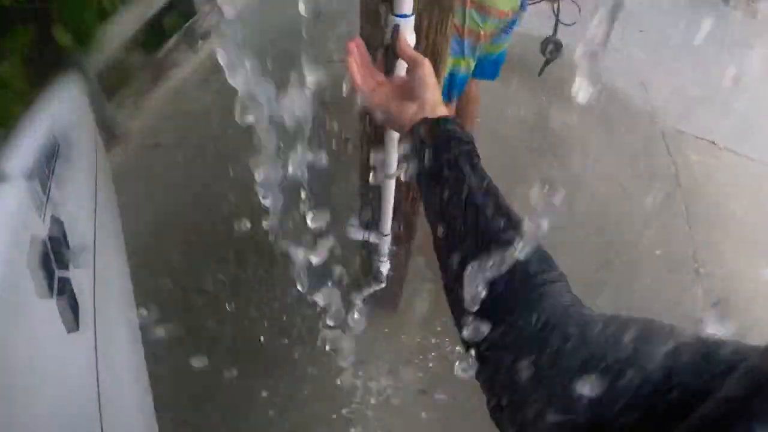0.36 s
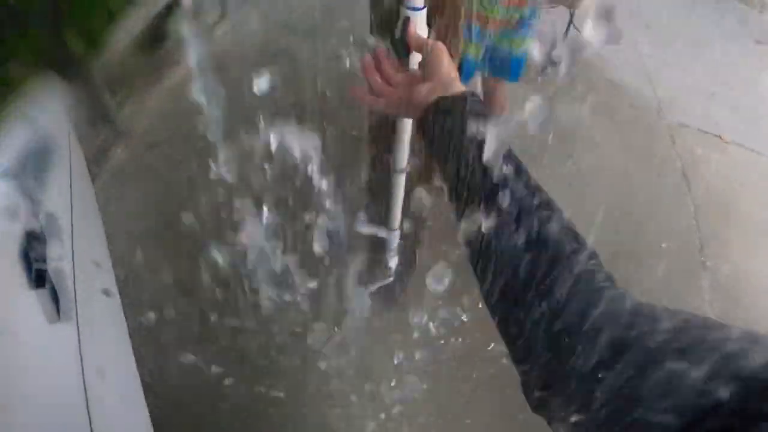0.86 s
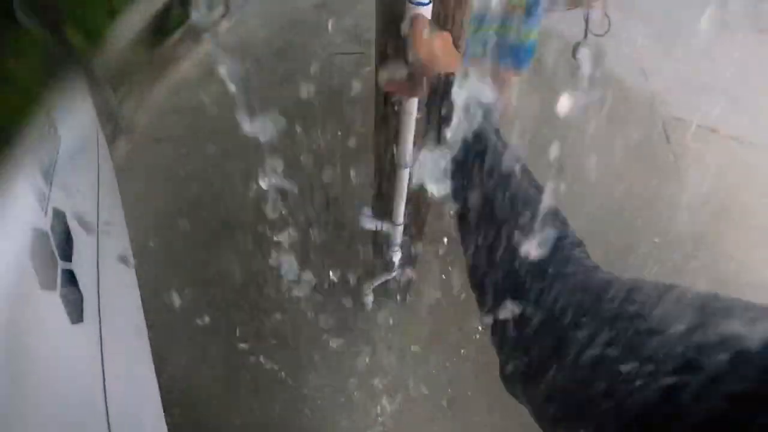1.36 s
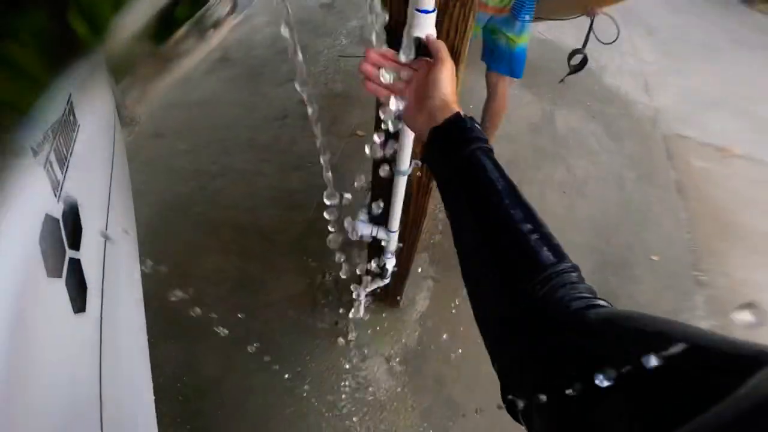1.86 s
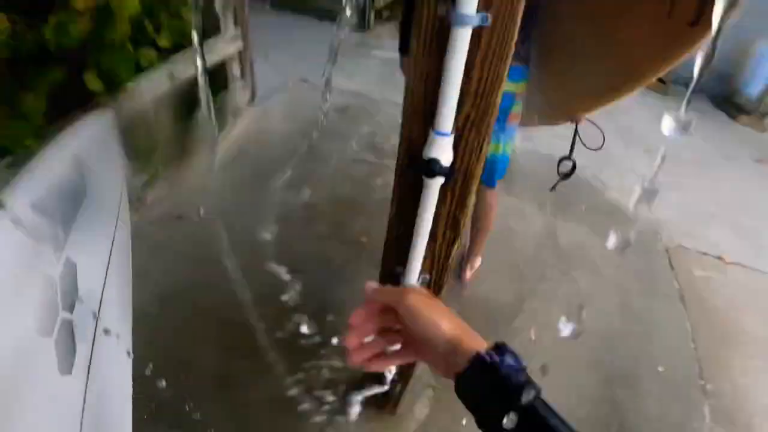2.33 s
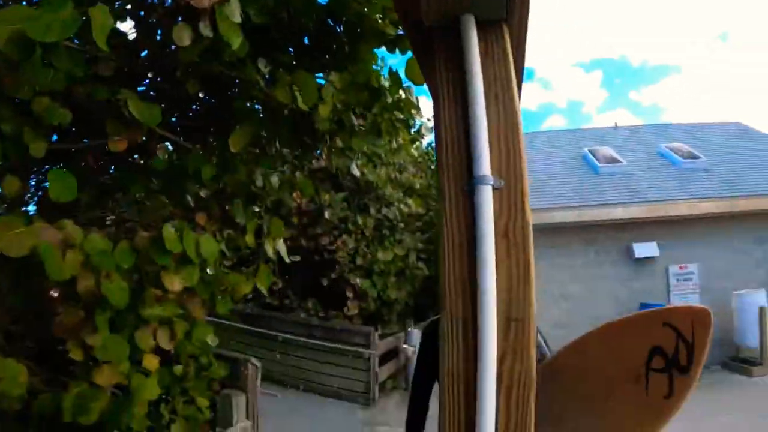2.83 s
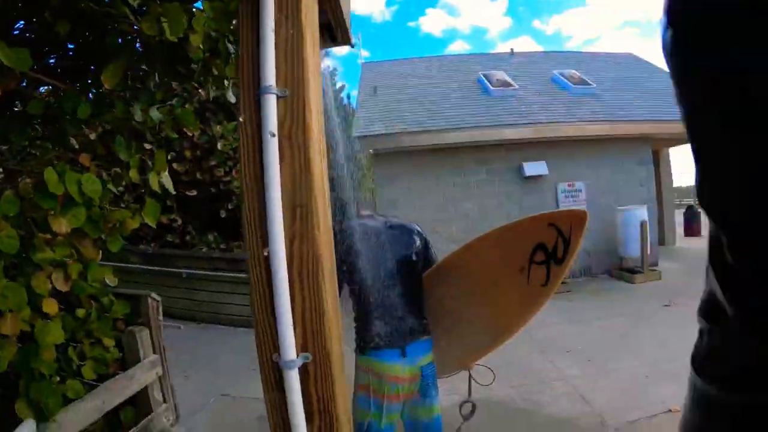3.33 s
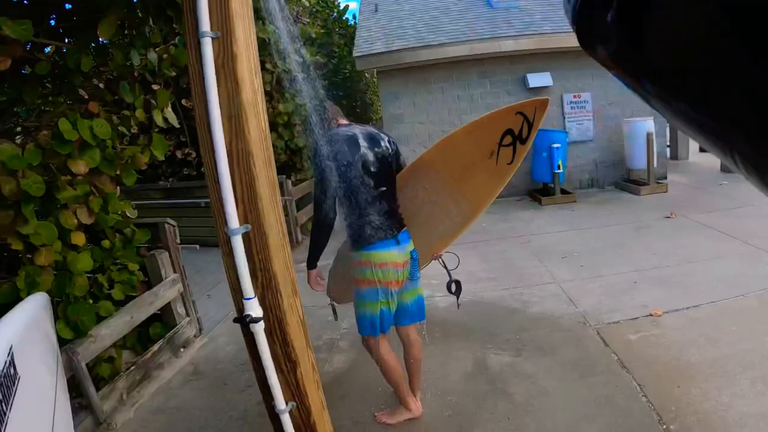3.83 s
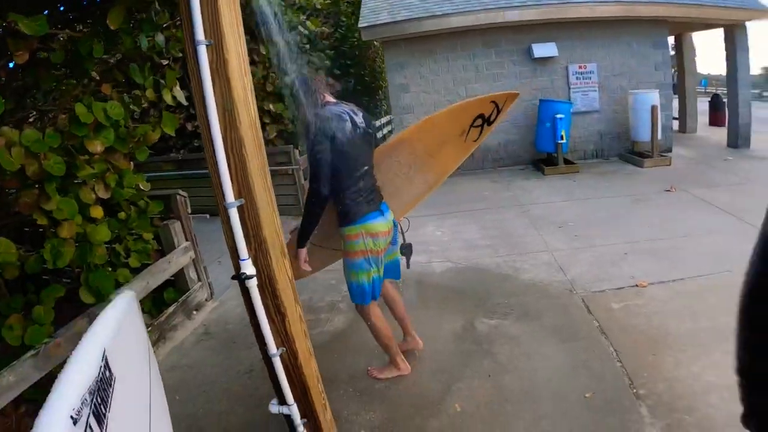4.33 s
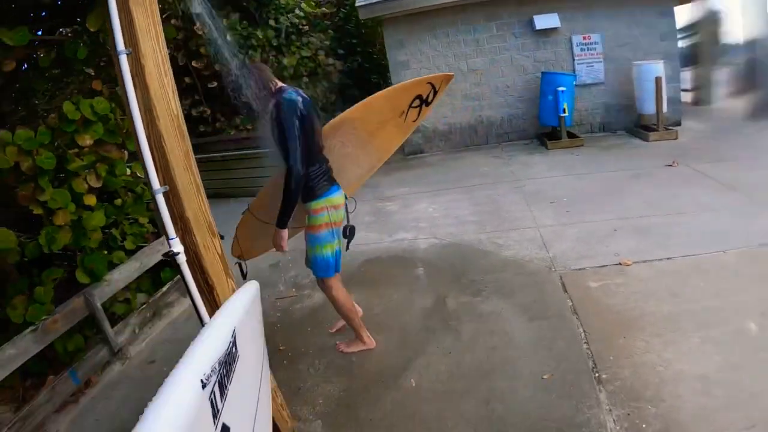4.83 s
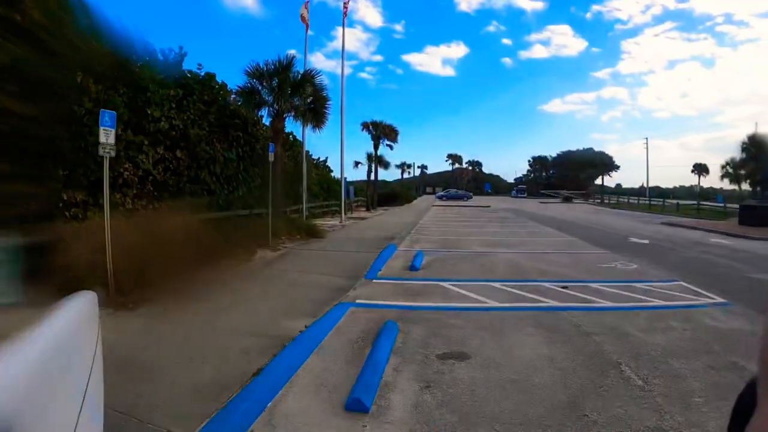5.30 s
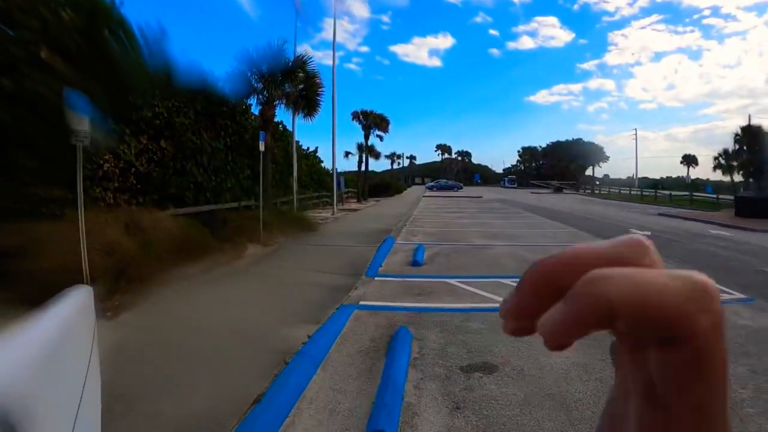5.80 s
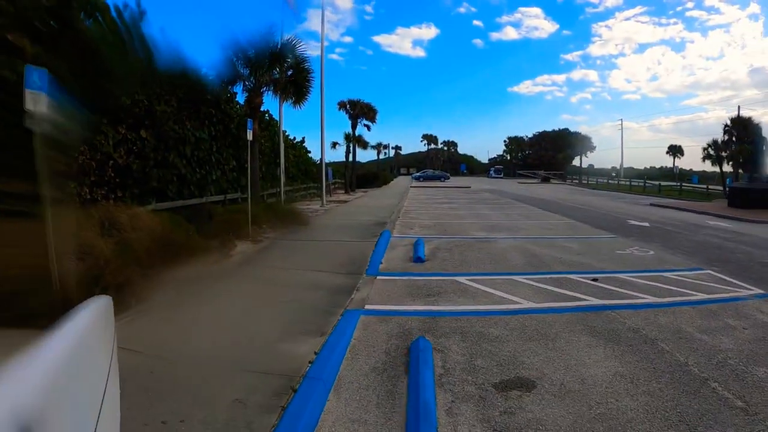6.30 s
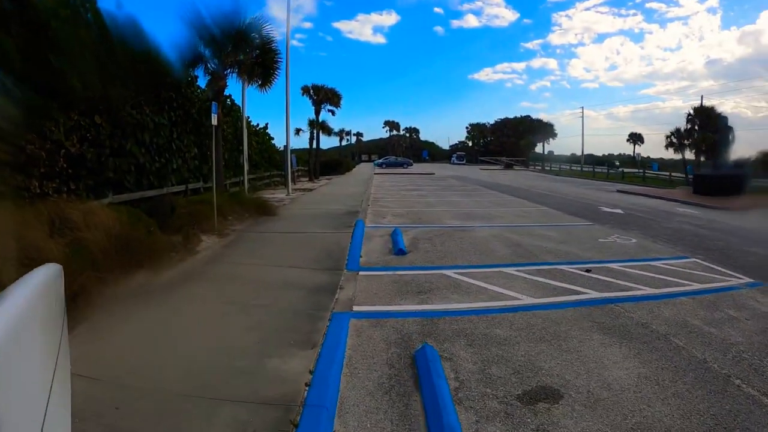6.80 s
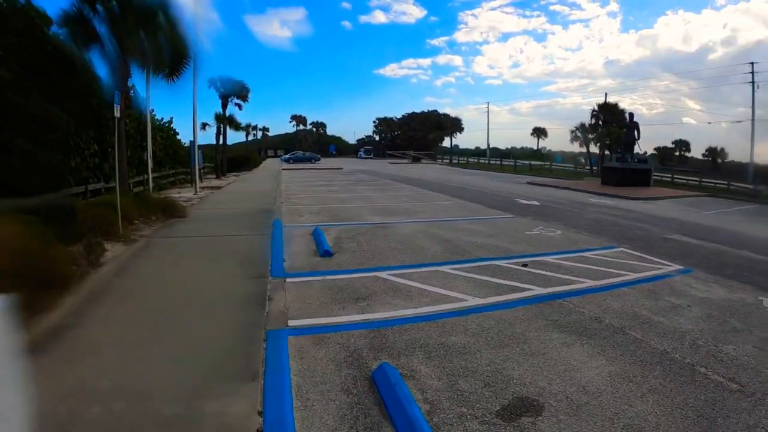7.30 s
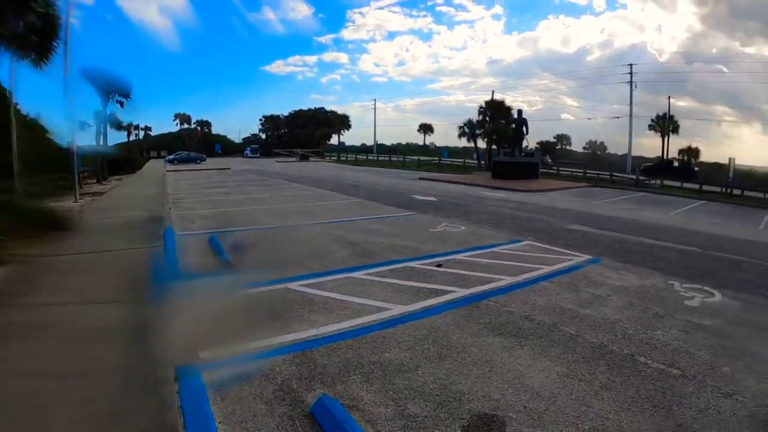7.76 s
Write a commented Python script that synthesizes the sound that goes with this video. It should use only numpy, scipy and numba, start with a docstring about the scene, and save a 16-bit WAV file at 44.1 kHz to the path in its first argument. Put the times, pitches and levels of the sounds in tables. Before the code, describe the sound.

Beach shower water splatters, plops and gurgles muffled against a wet waterproof microphone, thins, cuts out, then muffled wind, footsteps and a faint idling diesel.

```python
"""Shower to car park

A wet action camera hears a beach shower, then a spot beside it; after a short silence a scuff leads to a car park.
Noise in six bands makes the spray and wind, dulled by a water-filled housing that rings near 1.2 kHz.
Sliding tones plop on the two microphone ports, short rings make taps and drips, and bursts of noise make spits.
Steps are low jolts, a diesel and a pump are sums of wavering tones, and a limiter ducks after loud hits.
"""
import sys
import numpy as np
from scipy import signal
from scipy.fft import rfft, irfft, next_fast_len
from scipy.io import wavfile
from scipy.ndimage import uniform_filter1d
from numba import njit

SR = 44100
rng = np.random.default_rng(int(sys.argv[2]) if len(sys.argv) > 2 else 0)


def volts_from_decibels(level):
    """Turn decibel levels (scalar or array-like) into linear amplitude factors."""
    exponent = np.asarray(level, float) / 20
    return 10 ** exponent


def master(y):
    """Save y as 16-bit WAV."""
    cut = np.clip(np.atleast_2d(y).T, -1, 1)
    pcm = np.round(cut * 32767)  # scale
    wavfile.write(sys.argv[1], SR, pcm.astype(np.int16))


N = 359415
T = np.arange(N) / SR


def walk(rate, size):
    """Random levels held 1 / rate s and smoothed twice; spread near 1."""
    hold = int(SR / rate)
    steps_held = np.repeat(rng.standard_normal(size // hold + 1), hold)
    return 1.86 * uniform_filter1d(uniform_filter1d(steps_held, hold), hold)[:size]


def over_hz(table, size):
    """The columns of a (Hz, ..) table at every bin, joined on a log-frequency axis."""
    hz, *columns = np.transpose(table)
    bins = np.log(np.fft.rfftfreq(size, 1 / SR) + 1)
    return [np.interp(bins, np.log(hz), c) for c in columns]


def over_time(table, first, last):
    """The columns of a (time, ..) table at every sample of a stretch, with soft corners."""
    s, *columns = np.transpose(table)
    return [uniform_filter1d(np.interp(T[first:last], s, c), size=300) for c in columns]


def add(out, s, sound):
    """Mixes a short sound in at a moment."""
    i = max(int(s * SR), 0)
    out[..., i:i + sound.shape[-1]] += sound[..., :out.shape[-1] - i]


def patter(size, rate, spread_db, share):
    """Steady noise with single droplets of very uneven size in it."""
    hit = rng.random(size) < rate / SR
    drops = hit * rng.standard_normal(size)
    drops = drops * volts_from_decibels(spread_db * np.minimum(rng.exponential(size=size), 3))
    steady = np.sqrt(1 - min(share, 1) ** 2) * rng.standard_normal(size)
    return steady + share * drops / drops.std()


# Borders between the bands: buffeting | cavity | valley | housing | low hiss | high hiss: frequency [Hz]
BAND_EDGES = [197, 720, 960, 1708, 2550]
# How much each band flickers, low to high, before a place's raggedness scales it: level [dB]
BAND_FLICKER = [2.5, 1.5, 2, 1.2, 1.5, 1.5]
# Treble ring of the wet left port: (frequency [Hz], width [Hz], boost [dB])
LEFT_PORT_RING = (4500, 900, 11)
# The valley near 850 Hz against the housing ring: (time [s], level [dB])
VALLEY = [(0.1, -9), (1.6, -7.5), (1.95, -19.5), (2.2, -8), (3.2, -10.5), (3.3, -20.5), (3.44, -18),
          (3.55, -11.5), (5.0, -9), (5.35, -11.5), (5.6, -11), (8.1, -11)]
CAVITY_FOLLOWS = 0.78  # dB for each dB that the housing ring moves
LEAN_SPREAD_DB, LEANS_PER_S = 6, 9.03


def rush(span, ports, curves, hiss, colour, grain, wet, ragged):
    """Spray and wind: partly shared by the ports, six bands that swell together and flicker alone."""
    first, last = int(span[0] * SR), min(int(span[1] * SR), N)
    length = last - first
    size = next_fast_len(length)
    hz = np.fft.rfftfreq(size, 1 / SR)

    left_db, right_db, lead, like = over_hz(ports, size)
    like = np.clip(like, 0, 1)
    shared, own = rfft(patter(size, *grain)), rfft(patter(size, *grain))
    right = like * np.exp(1j * lead) * shared + np.sqrt(1 - like ** 2) * own
    pair = volts_from_decibels(left_db) * np.array([shared, volts_from_decibels(right_db) * right])
    ring_hz, width_hz, ring_db = LEFT_PORT_RING
    pair[0] *= volts_from_decibels(wet * ring_db / (1 + (2 * (hz - ring_hz) / width_hz) ** 2))
    pair *= 1 / np.sqrt(1 + (hz / 7500) ** 6)  # the housing lets little through at the very top

    housing_db, buffet_db = over_time(curves, first, last)
    low_db, high_db = over_time(hiss, first, last)
    usual_db = np.median(housing_db)
    cavity_db = usual_db + colour[0] + CAVITY_FOLLOWS * (housing_db - usual_db)
    valley_db = housing_db + np.interp(T[first:last], *np.transpose(VALLEY))
    pan_db = colour[1] + LEAN_SPREAD_DB * walk(LEANS_PER_S, length)
    swell = (1 + grain[2]) * walk(14, length)  # the larger the share of droplets, the lumpier

    below = [0] + [1 / (1 + (hz / edge) ** 24) for edge in BAND_EDGES] + [1]
    out = np.zeros((2, N))
    for k, band_db in enumerate([buffet_db, cavity_db, valley_db, housing_db, low_db, high_db]):
        band = irfft(pair * np.sqrt(below[k + 1] - below[k]), size)[:, :length]
        if k == 0:  # gusts hit now one port, now the other
            lean = volts_from_decibels(np.array([pan_db, -pan_db]) / 2)
            band = band / band.std(axis=1, keepdims=True) * lean * 2 / np.sqrt((lean ** 2).sum(axis=0))
        else:
            band = band / band.mean(axis=0).std()
        motion_db = .6 * swell + BAND_FLICKER[k] * walk(40, length)
        out[:, first:last] += band * volts_from_decibels(band_db + (ragged if k > 1 else 1) * motion_db)
    ends = np.interp(T, [span[0] - .006, span[0] + .006, span[1] - .008, span[1]], [0, 1, 1, 0])
    return out * ends


# In every list of places: under the shower, beside it, a scuff over the ports, the car park.
# When each place sounds: (start [s], end [s])
SPANS = [(0, 2.565), (2.56, 5.09), (5.24, 5.465), (5.46, 8.2)]
# Tone of the rush through the two ports, shape within each band; one table for each place:
# (frequency [Hz], left level [dB per Hz], right minus left [dB], right lead [rad], likeness [0-1])
UNDER_PORTS = [(24.9, -55, -16, -3.5, 0.1), (50, -53, 7.5, 1.8, 1), (85, -50, 0.5, 0.98, 0.7),
               (160, -57, -2.5, 1.5, 0.7), (300, -59.5, -12, -1, 0.1), (487, -49, -13.5, -1.5, 0.5),
               (640, -52.5, -11, -1.7, 1), (803, -72, -1.5, -1.83, 0.94), (1264, -59.5, 1.5, -1.5, 1),
               (1722, -89, 3.5, -2, 0.7), (1990, -81, -5.5, -3, 0.3), (2580, -94, -3, -1.5, 0.5),
               (3240, -96.5, 2.5, -1.5, 0.93), (3930, -103, 5, -1.5, .5), (4500, -103, -3.5, -2.5, 0.6),
               (7100, -117, -13, -7, 0.4)]
BESIDE_PORTS = [(25, -55, -8.5, -1, 0.44), (50, -31, -17.5, 0.1, 1), (89, -45, -14.5, -2, 0.8),
                (160, -54, -7.5, -0.7, 0.22), (300, -62.5, -12, -1.5, 0.13), (490, -52.5, -10.5, 0, 0.23),
                (636, -59.5, -13, -2.5, 0.9), (868, -76.5, 1.5, -1.6, 1), (1196, -65, -0.5, -1.43, 0.92),
                (1557, -90, 5, -2, 0.72), (1990, -89.5, -9, -2, 0.53), (3050, -108, -4.5, -14, 0.28),
                (4300, -116, 4, 8.5, 0.31), (6950, -135, -0.5, 1, 0.12)]
SCUFF_PORTS = [(25.1, -51, -8, -2.5, .4), (100, -53, -10, -1.5, .4), (170, -61.5, -7.5, 2, .5),
               (280, -60, -11.5, -2.5, 0.59), (380, -64, -15, -2, 0.87), (482, -53.5, -14, 2.5, 0.77),
               (600, -65, -5.5, 3.5, 0.74), (850, -73.5, -3.5, 5, 1), (1130, -61, 0, 4.5, 0.72),
               (1350, -59.5, 2, 5, 1), (1710, -66.5, 3.5, 4.5, 0.96), (2230, -71.5, 4.5, 5, .9),
               (2520, -89, 0, 5.5, .8), (3050, -91.5, 4.5, 4, .7), (3400, -100, 0.5, 5, .5),
               (4500, -104, -1, 21, .3), (5200, -120, 5, 9, .2), (7000, -140, 3.5, -0.5, .1)]
CAR_PARK_PORTS = [(25, -60, -12, -7, 0.45), (50, -47.5, -9, -5.5, 1), (90, -56, -7.5, 0.47, 0.83),
                  (160, -55, -7.5, 0.33, 0.33), (300, -57, -9, 1.5, 0.93), (500, -54, -17, 5, 0.4),
                  (607, -61.5, -12, 2.5, 0.36), (951, -78.5, -2.5, 4.5, 0.4), (1287, -63.5, 2, 4.5, 1),
                  (1663, -79.5, 2.5, 4.5, 0.95), (2200, -82, 4, 4.5, 0.47), (2540, -94, 1.5, 4.5, 0.77),
                  (2920, -97.5, 3.5, 4.5, .7), (3260, -105, 3.5, 4.5, 0.68), (4470, -111, -4, 4.5, 0.22),
                  (7040, -132, -1, 0, 0.083)]
# Per place, before swell and flicker: (time [s], housing ring level [dB], buffeting level [dB])
RUSH_LEVELS = [
    [(0.0, -35, -23), (0.11, -29.5, -28), (0.2, -30.5, -30.5), (0.7, -27, -24), (0.81, -25.5, -28),
     (0.83, -32.5, -26), (0.89, -29.5, -28), (0.91, -27.5, -21.5), (1.3, -24.5, -25.5), (1.48, -24, -21),
     (1.59, -38, -30.5), (1.75, -33.5, -32.5), (1.95, -35, -41.5), (2.1, -34, -24.5), (2.125, -42.5, -21),
     (2.35, -30, -19.5), (2.42, -40.5, -25), (2.56, -29.5, -18)],
    [(2.565, -60.5, -19.5), (2.62, -57, -11.5), (2.64, -67, -45), (2.697, -60, -41.5), (2.729, -50, -36),
     (2.755, -60.5, -39), (2.91, -53, -43), (3.3, -48.5, -44.5), (3.5, -47.5, -34.5), (3.62, -44, -25),
     (3.81, -40.5, -32), (4.31, -36, -32), (4.47, -38, -36), (4.63, -31, -21), (4.74, -37.5, -28),
     (5.06, -40.5, -30)],
    [(5.24, -94, -62), (5.305, -27, -31.5), (5.35, -24, -26), (5.4, -18, -29.5), (5.44, -13, -26),
     (5.46, -29.5, -14)],
    [(5.47, -37, -42), (5.57, -38.5, -29), (5.7, -52, -33), (5.84, -44, -32.5), (5.98, -51.5, -43),
     (6.14, -42.5, -36), (6.66, -42.5, -39.5), (7.17, -40.5, -33), (7.31, -37, -28), (7.45, -43.5, -33),
     (7.8, -41.5, -28.5), (8.15, -46, -40)],
]
# Per place, before swell and flicker: (time [s], low hiss level [dB], high hiss level [dB])
HISS_LEVELS = [
    [(0, -60.5, -70.5), (.1, -57.5, -64), (.4, -59.5, -67), (.8, -53, -59), (.83, -60, -64.5),
     (.92, -53.5, -60), (1.2, -52, -58), (1.53, -54, -59), (1.59, -62, -69), (1.95, -62.5, -71),
     (2.05, -67, -69.5), (2.14, -71, -76), (2.28, -71, -69), (2.37, -46.5, -65), (2.41, -69, -76),
     (2.5, -45, -64), (2.56, -47.5, -60.5)],
    [(2.565, -74, -87), (2.62, -84, -95), (2.65, -87, -100), (2.72, -76, -84.5), (2.77, -87.5, -83.5),
     (2.9, -78.5, -85.5), (3.1, -74, -80), (3.19, -72, -79), (3.25, -76, -81), (3.35, -74, -79),
     (3.5, -72, -76), (4.0, -61.5, -76), (4.4, -62, -72.5), (4.69, -56.5, -73), (4.88, -69.5, -77.5),
     (5.02, -68.5, -73), (5.08, -68, -81.5)],
    [(5.24, -93, -105), (5.275, -81.5, -98), (5.305, -56.5, -57.5), (5.35, -53, -61.5), (5.382, -33, -41),
     (5.408, -33.5, -53.5), (5.426, -20.5, -35), (5.453, -22, -41.5), (5.465, -51, -63)],
    [(5.47, -63.5, -67), (5.55, -52, -63), (5.7, -65, -78), (5.88, -56.5, -71.5), (5.94, -69, -79),
     (6.05, -58, -74.5), (6.25, -55, -72), (6.5, -50, -68.5), (6.9, -56, -65.5), (7.1, -54, -67.5),
     (7.3, -47, -62.5), (7.45, -55, -70.5), (7.78, -67.5, -65), (7.95, -59, -67), (8.15, -67, -71.5)],
]
# Per place: (usual port cavity level above the housing ring [dB], mean lean of the gusts to the left [dB])
COLOUR = [(2, 1.4), (4.5, 13.7), (-2.5, 8), (7, 10)]
# Droplets per place: (rate [1/s], spread [dB], share of the rush [0-1])
DROPLETS = [(600, 2.3, .62), (500, 3.0, .5), (900, 1.5, .45), (300, 2.0, .12)]
# Per place, how much of the left port's treble ring is heard: share [0-1]
LEFT_PORT_WET = [1, 1, 0, .3]
# Per place, how much the bands above the cavity swell and flicker: factor
RAGGED = [.7, 1.2, 1.5, .4]


def water():
    """The rush of every place in turn, each with its own port colour and droplets."""
    ports = [UNDER_PORTS, BESIDE_PORTS, SCUFF_PORTS, CAR_PARK_PORTS]
    places = zip(SPANS, ports, RUSH_LEVELS, HISS_LEVELS, COLOUR, DROPLETS, LEFT_PORT_WET, RAGGED)
    return sum(rush(*place) for place in places)


# Water plopping over a port, levels before dulling and rasp:
# (time [s], left level [dB], right level [dB], pitch at the peak [Hz])
PLOPS = [(0.023, -2.5, -32, 307), (0.149, -10.5, -2, 142), (0.342, 1.5, -32.5, 367),
         (0.546, -6.5, -18, 220), (0.818, 3.5, -34, 330), (1.119, -13, -11, 266), (1.248, -25.5, -4.5, 160),
         (1.273, -1.5, -34, 379), (1.311, 2, -33, 280), (1.546, -4, -39, 330), (2.113, -16, -16, 610),
         (2.139, -20, -18, 694), (2.148, -11.5, -45, 217), (2.164, -28, -22, 760), (2.33, -11, -17, 332),
         (2.368, -9, -19, 565), (2.376, -8.5, -9, 200), (2.425, -11.5, -24, 510), (2.445, -19.5, -21, 685),
         (2.468, -4, -5, 189), (2.488, 1.5, -25, 229.5), (2.533, 7, 5, 331), (2.552, 17.5, -15, 310),
         (2.572, -12, -20, 518), (2.6, -10, -17, 477), (2.617, -15.5, -28, 760), (2.623, -19, -4.5, 107.2),
         (2.729, -20.5, -11.5, 162), (2.739, 2, -35, 300), (2.799, -15.5, -39, 279), (3.862, -34, -26, 607),
         (4.027, -35, -25.5, 352), (4.387, -49.5, -14, 270), (4.446, -9, -18, 195),
         (4.457, -38.5, -6.5, 165), (4.477, -0.5, -20, 292), (4.64, -19, -24, 337),
         (5.047, -19.5, -25, 390), (5.637, -11, -29, 643), (5.638, -1, -40, 259), (5.782, -18, -40, 504),
         (5.995, -21, -39, 583), (6.76, -10, -28.5, 337), (7.49, -12.5, -42, 543), (7.496, -4, -24, 148),
         (7.921, -10, -33, 400)]
# Air pockets, mostly in the left port, that ring on one pitch, levels before dulling and rasp:
# (time [s], left level [dB], right level [dB], pitch [Hz])
POCKETS = [(3.699, -19, -47, 443), (5.397, -6.5, -17, 249), (5.411, -0.5, -12.5, 271),
           (5.422, -2, -18, 280), (5.42, -5.5, -25, 500), (5.575, 1, -52, 490), (6.031, -14.5, -49, 568)]
# Random small plops; they thicken as the stream breaks up: (start [s], end [s], count)
GURGLES = [(0, 2.11, 70), (2.24, 2.55, 30), (2.29, 2.39, 16), (2.42, 2.55, 36)]
PLOP_ENDS_AT = 0.39  # final pitch as a share of the pitch at the peak
PLOP_DECAY_S, POCKET_DECAY_S = 0.0062, 0.0098
PLOP_WOBBLE, PLOP_RASP = .85, .25  # roughness of the phase and of the level; pockets get less
PLOP_TOP_HZ = 1400  # the water film dulls the ring


def plops():
    """A film of water closes over a port: a short ring slides down in pitch; air pockets hold theirs."""
    out, t = np.zeros((2, N)), np.arange(-.006, .07, 1 / SR)
    small = []
    for start, end, count in GURGLES:
        for when, side, size, pitch in rng.random((count, 4)):
            to_right = 30 * (side > .65)
            small.append((start + (end - start) * when, -12 - to_right - 13 * size,
                          -46 + to_right - 13 * size, 200 + 700 * pitch ** 2))
    kinds = ((PLOPS + small, PLOP_ENDS_AT, PLOP_DECAY_S, 1, 1),
             (POCKETS, 1, POCKET_DECAY_S, .3, 2))  # pockets hold before they die
    for rows, ends_at, decay_s, rough, hold in kinds:
        slide = ends_at + (1 - ends_at) * np.exp(-np.clip(t, -.002, 1) / 0.0032)
        turn = 2 * np.pi * np.cumsum(slide) / SR
        turn = turn - turn[t >= 0][0]
        shape = np.where(t < 0, np.exp(-(t / 0.0018) ** 2), np.exp(-np.abs(t / decay_s) ** hold))
        for s, left_db, right_db, hz in rows:
            wobble = uniform_filter1d(uniform_filter1d(rng.standard_normal(len(t)), size=80), size=80) * 11
            ring = np.cos(hz * turn + rough * PLOP_WOBBLE * wobble * np.clip(t / .003, 0, 1))
            grit = uniform_filter1d(uniform_filter1d(rng.standard_normal(len(t)), size=50), size=50) * 9
            rasp = 1 + rough * PLOP_RASP * grit
            add(out, s + t[0], volts_from_decibels(np.array([[left_db], [right_db]])) * shape * ring * rasp)
    return signal.sosfiltfilt(signal.butter(3, PLOP_TOP_HZ, fs=SR, output="sos"), out)


# Taps on the housing, before its dulling: (time [s], level [dB])
TAPS = [(1.195, -10), (1.371, -12.5), (1.65, -11.5), (2.09, -13), (2.106, -9), (2.113, -3.5), (2.241, -7.5),
        (2.416, -13.5), (2.475, -3), (2.518, 4), (2.531, -4), (2.547, 5.5), (2.723, -22), (2.954, -22),
        (3.984, -20.5), (4.027, -12), (4.105, -17), (4.443, -10), (4.475, -22), (4.985, -18), (5.246, -43),
        (5.914, -2.5), (6.762, -15), (7.679, -22.5)]
TAP_RING_HZ, TAP_SCATTER, TAP_TOP_HZ = 1066, 0.022, 1700  # scatter is a share of the pitch


def taps():
    """Knocks ring the housing briefly, a quarter turn later on the right; pitch varies with the spot hit."""
    out, t = np.zeros((2, N)), np.arange(0, .03, 1 / SR)
    knock = (t / 0.00029) ** 2 * np.exp(-t / 0.00039)
    after_ring = 0.027 * np.minimum(t / 0.00094, 1) * np.exp(-t / 0.0018)
    shape = knock + after_ring
    for (s, db), spot in zip(TAPS, rng.standard_normal(len(TAPS))):
        hz = TAP_RING_HZ * (1 + TAP_SCATTER * spot)
        ring = np.sin(2 * np.pi * hz * t - np.array([[0], [1.55]]))
        add(out, s, volts_from_decibels(db) * shape / shape.max() * ring)
    return signal.sosfilt(signal.butter(2, TAP_TOP_HZ, fs=SR, output="sos"), out)


# Bright spits of spray, level averaged over the ports:
# (time [s], peak level [dB], left minus right [dB], gain of the bright edge [dB])
SPITS = [(0.1248, -32.5, 26, -37), (0.195, -28.5, 41, -12), (0.2561, -48, 12, -38),
         (0.3005, -38.5, 18, -35), (1.8096, -45.5, 24, -23), (1.8452, -46.5, 18, -26),
         (1.893, -47, 16.5, -25), (1.9759, -53, 15, -25), (2.11, -48, 5, -37), (2.241, -50, 5, -34),
         (2.466, -43.5, 9.5, -29), (2.476, -43.5, 4, -30.5), (2.489, -41, 13, -25), (2.5062, -41, 20, -22),
         (2.5306, -31, 3, -40), (4.9781, -60.5, -24, -41.5), (5.637, -37, 7, -34), (5.902, -54.5, -12, -35),
         (5.913, -45.5, 2, -39.5), (6.9247, -57, 2, -30.5), (7.157, -62.5, -1, -21.5),
         (7.488, -54.5, -2, -29)]


def spits():
    """Fine droplets burst at a port: a soft crack under 6 kHz, some with a brighter edge; faint random ones."""
    out, t = np.zeros((2, N)), np.arange(0, .012, 1 / SR)
    body = signal.butter(4, [1500, 5800], "band", fs=SR, output="sos")
    edge = signal.butter(4, [5500, 13000], "band", fs=SR, output="sos")
    faint = [(2.55 * when, -60 + 10 * size ** 2, 10, -30) for when, size in rng.random((140, 2))]
    for s, db, pan_db, edge_db in SPITS + faint:
        burst = rng.standard_normal(len(t)) * t * np.exp(-t / .001)
        crack = signal.sosfilt(body, burst) + volts_from_decibels(edge_db) * signal.sosfilt(edge, burst)
        lean = volts_from_decibels(np.array([[pan_db], [-pan_db]]) / 2)
        add(out, s, volts_from_decibels(db) * crack / np.abs(crack).max() * 2 * lean / lean.sum())
    return out


# Single drops that ring as the spray thins: (time [s], level before doubling [dB], pitch [Hz])
DRIPS = [(1.02, -44.5, 2200), (1.638, -52.5, 2850), (1.69, -49, 2660), (1.81, -47.5, 4500),
         (1.952, -53.5, 2200), (1.978, -51, 4400), (2.22, -59, 4500), (2.375, -57, 4500),
         (2.488, -58, 4600), (2.508, -52.5, 4600), (2.547, -35.5, 4500), (5.576, -47, 2400),
         (5.637, -42.5, 3000), (7.487, -43.5, 2670)]
DRIP_DECAY_S, DRIP_RIGHT_DB = 0.00073, -13.5  # right port against left


def drips():
    """A lone drop rings for a few cycles, mostly at the left port."""
    out, t = np.zeros((2, N)), np.arange(0, .015, 1 / SR)
    shape = t / DRIP_DECAY_S * np.exp(1 - t / DRIP_DECAY_S)
    for s, db, hz in DRIPS:
        level = 2 * volts_from_decibels(np.array([[db], [db + DRIP_RIGHT_DB]]))
        add(out, s - DRIP_DECAY_S, level * shape * np.sin(2 * np.pi * hz * t))
    return out


# Footfalls shaking the camera: (time [s], left level [dB], pitch [Hz])
STEPS = [(5.462, -18, 80.3), (5.477, -6.5, 70), (5.508, -0.5, 42.9), (5.861, -9, 46.3), (6.359, -10, 45.3),
         (6.871, -13, 36), (7.363, -7, 50), (7.911, -9.5, 49.2)]
STEP_CYCLES = 0.8  # half-length of a jolt


def steps():
    """Each footfall pumps the water in the left port for about a cycle and a half; the right gets less."""
    out, t = np.zeros((2, N)), np.arange(-.05, .08, 1 / SR)
    for s, db, hz in STEPS:
        jolt = np.exp(-(t * hz / STEP_CYCLES) ** 2) * np.cos(2 * np.pi * hz * t + .5)
        add(out, s + t[0], volts_from_decibels(np.array([[db], [db - 18.5]])) * jolt)
    return out


def heard(left, ports):
    """A far source at both ports: the right one differs from the left in level and phase."""
    _, right_db, lead, _ = over_hz(ports, N)
    return np.array([left, irfft(rfft(left) * volts_from_decibels(right_db) * np.exp(1j * lead), N)])


# Idling diesel: (time [s], cycle rate [Hz], level [dB])
DIESEL = [(5.6, 23.2, -29), (5.9, 23.17, -29.5), (6.001, 22.89, -24.5), (6.3, 22.92, -21),
          (6.4, 22.89, -27), (6.6, 22.8, -20), (6.9, 22.75, -20), (7.301, 22.72, -15.5),
          (7.421, 22.33, -23), (7.508, 22.36, -18.5), (7.617, 22.19, -24.5), (7.911, 22.13, -21.5),
          (8.03, 22.23, -23.5), (8.15, 22.28, -17)]
# Its tones, before they waver: (multiple of the cycle rate, relative level [dB])
DIESEL_ORDERS = [(3, -5), (4, 2), (5, 0), (6, 0), (7, 0.5), (8, -10), (9, -1.5), (10, -10), (11, -3.5),
                 (12, -2), (13, -3.5), (14, -5), (15, -10), (16, -20), (17, -16.5), (18, -16), (19, -14.5),
                 (20, -14.5), (21, -18.5), (22, -16), (23, -9.5)]


def diesel():
    """Several uneven throbs a cycle, each spread out with the bass leading; every order wavers a little."""
    s, hz, db = np.transpose(DIESEL)
    turn = 2 * np.pi * np.cumsum(np.interp(T, s, hz)) / SR
    on = T > s[0]
    tone = np.zeros(N)
    for k, order_db in DIESEL_ORDERS:
        level = volts_from_decibels(order_db + 1.1 * walk(3, on.sum()))
        offset = 9.0 * np.log(k) + 1.3 * (k % 2) + .45 * (k % 3)  # spreads the throbs, makes them uneven
        tone[on] += level * np.cos(k * turn[on] + offset + .2 * walk(5, on.sum()))
    gain = volts_from_decibels(np.interp(T, s, db)) * np.clip((T - s[0]) / 0.035, 0, 1)
    return heard(tone / tone[on].std() * gain, CAR_PARK_PORTS)


# Two stretches of the pump, gain on its lines: (time [s], level [dB])
PUMP_STRETCHES = [
    [(1.6, -40), (2.1, -30.5), (2.4, -34.5)],
    [(2.8, -48), (3.0, -43), (3.5, -36), (4.3, -31), (5.08, -29)],
]
# Lines of the hum: (frequency [Hz], relative level at 4 s [dB], drift [dB per s])
PUMP_LINES = [(139.4, 4, -0.5), (174.8, -5.5, 1.5), (207.5, -10.5, 1.5), (280, -7.5, 0.5), (317, -5.5, 5)]


def pump():
    """A few slightly wavering hum lines."""
    hum = np.zeros(N)
    for hz, db, drift in PUMP_LINES:
        level = volts_from_decibels(db + drift * (T - 4) + .8 * walk(5, N))
        hum += level * np.cos(2 * np.pi * hz * T + .2 * walk(4, N))
    gain = np.zeros(N)
    for s, db in map(np.transpose, PUMP_STRETCHES):
        gain += volts_from_decibels(np.interp(T, s, db, left=-99, right=-99))
    return heard(hum * uniform_filter1d(gain, size=900), BESIDE_PORTS)


def scene():
    """All sources at the two ports; the second place fades into silence and the very end is rounded off."""
    fade = np.interp(T, [5.065, 5.09, 5.2, 5.24, T[-200], T[-1]], [1, 0, 0, 1, 1, 0])
    return fade * (water() + plops() + taps() + spits() + drips() + steps() + diesel() + pump())


@njit
def follow(x, attack, release):
    """Peak follower: fast up, slow down."""
    y, e = np.empty(len(x)), 0.
    for i in range(len(x)):
        e += (x[i] - e) * (attack if x[i] > e else release)
        y[i] = e
    return y


def limiter(dry):
    """One gain for both ports pulls everything down on a loud hit and lets go over some 60 ms."""
    peak = follow(np.abs(dry).max(axis=0), 1 / (0.0031 * SR), 1 / (.06 * SR))
    gain = np.minimum(1, volts_from_decibels(-13) / (peak + 1e-9)) ** .85
    early = np.append(gain[130:], gain[-130:])  # it looks three milliseconds ahead
    return dry * uniform_filter1d(uniform_filter1d(early, size=120), size=120)


def band_limit(x):
    """A steep low-pass at the top of the band."""
    return signal.sosfilt(signal.butter(12, 13400, fs=SR, output="sos"), x)


def record(dry):
    """The camera's sound chain: the limiter makes the finished mix."""
    mix = limiter(dry)
    return band_limit(mix)


dry = scene()
out = record(dry)
master(out)
```